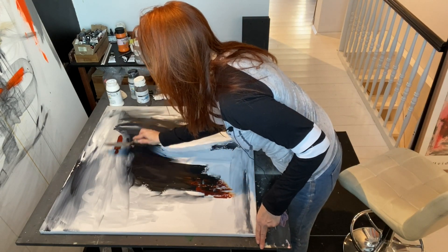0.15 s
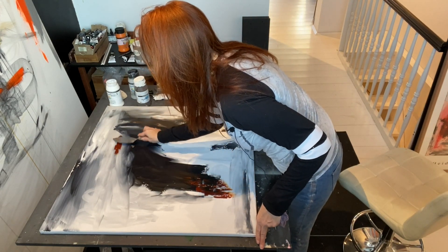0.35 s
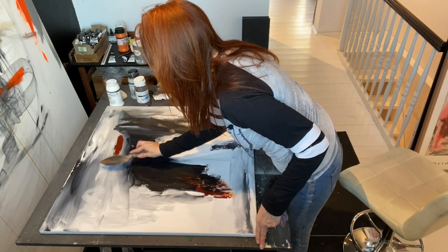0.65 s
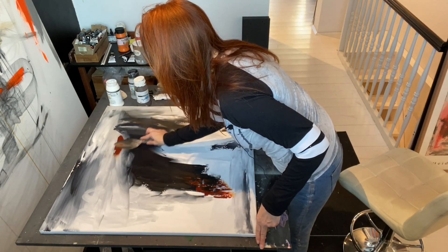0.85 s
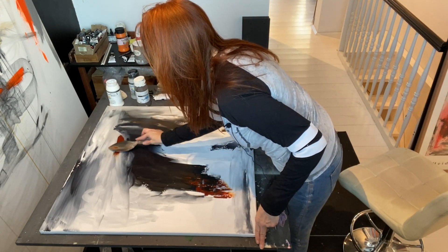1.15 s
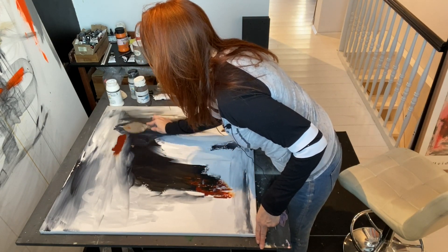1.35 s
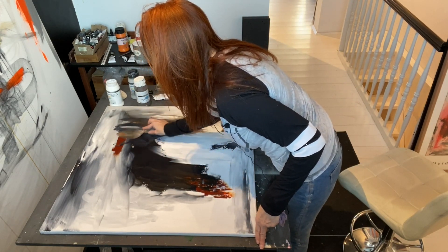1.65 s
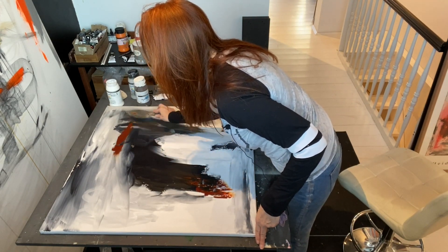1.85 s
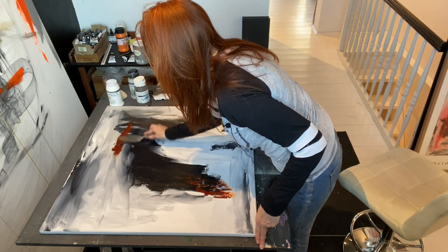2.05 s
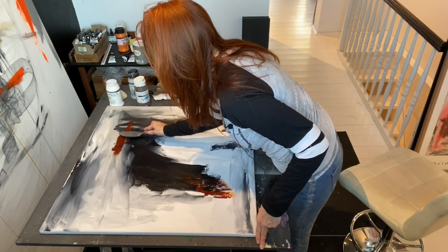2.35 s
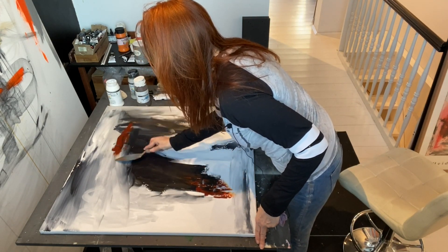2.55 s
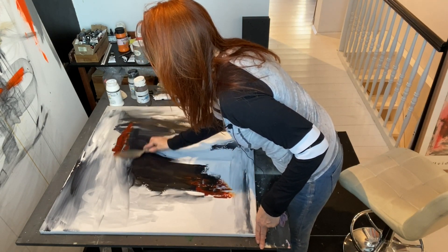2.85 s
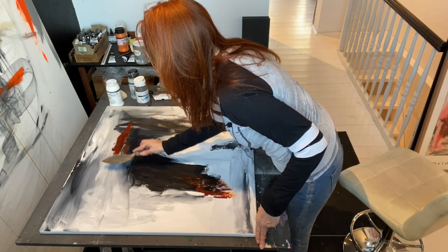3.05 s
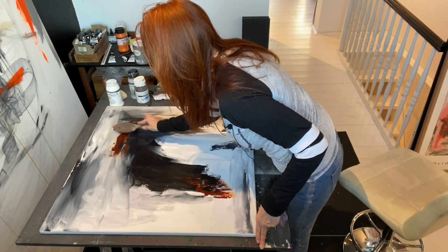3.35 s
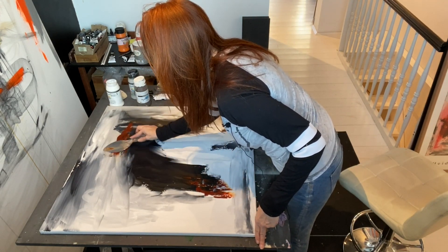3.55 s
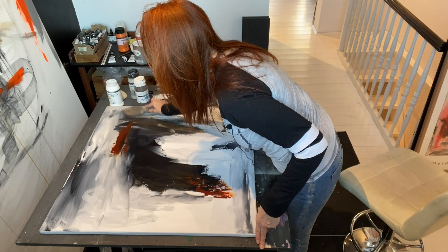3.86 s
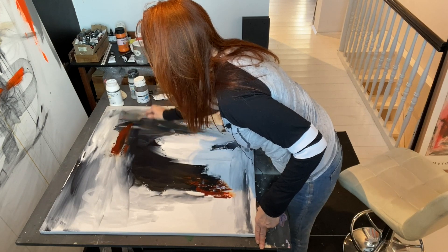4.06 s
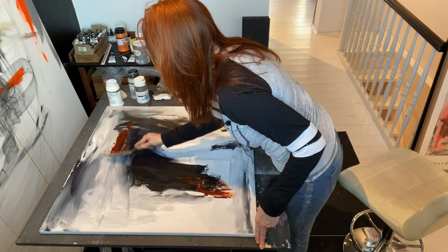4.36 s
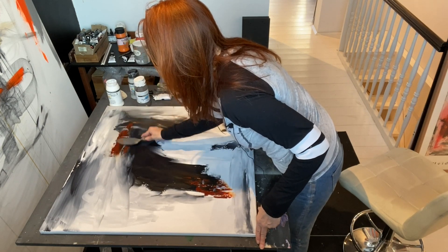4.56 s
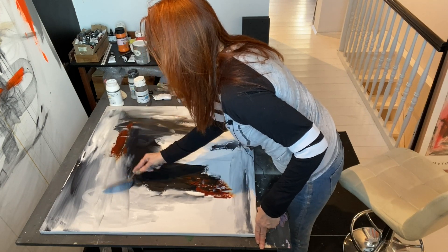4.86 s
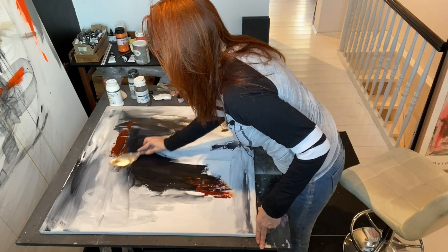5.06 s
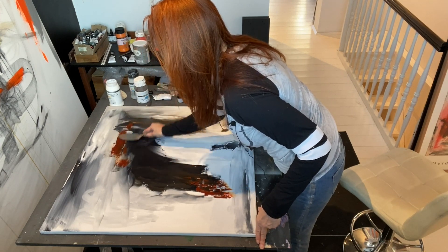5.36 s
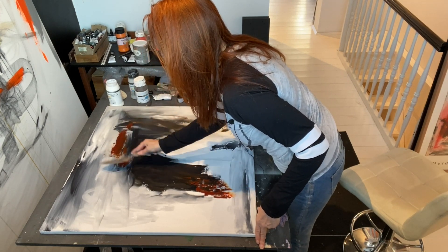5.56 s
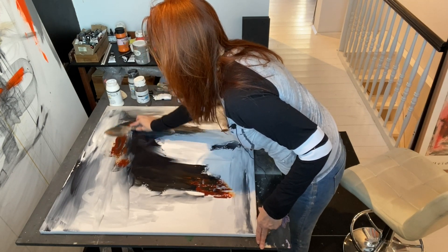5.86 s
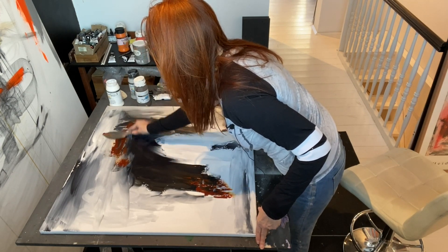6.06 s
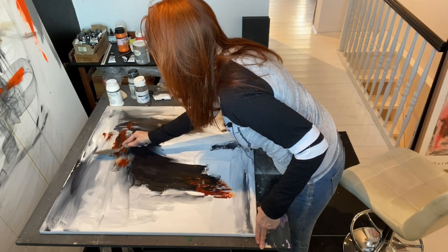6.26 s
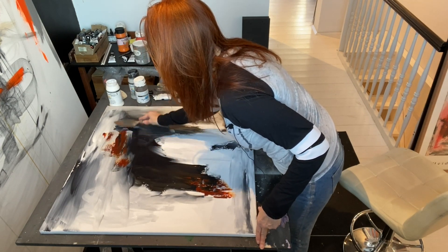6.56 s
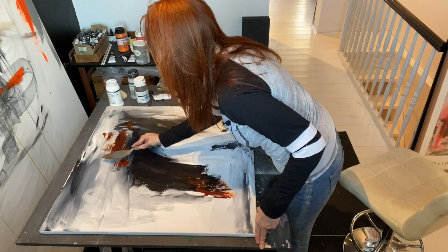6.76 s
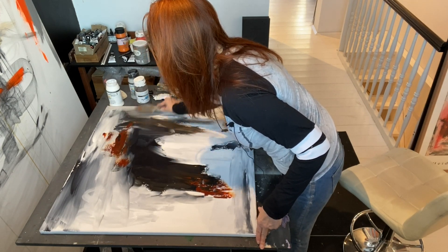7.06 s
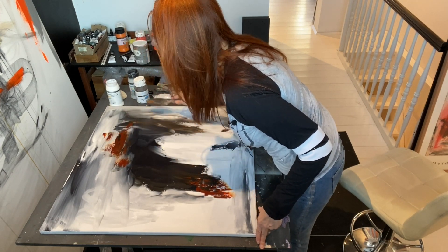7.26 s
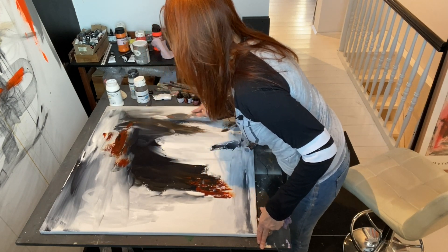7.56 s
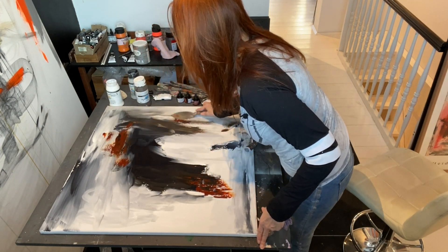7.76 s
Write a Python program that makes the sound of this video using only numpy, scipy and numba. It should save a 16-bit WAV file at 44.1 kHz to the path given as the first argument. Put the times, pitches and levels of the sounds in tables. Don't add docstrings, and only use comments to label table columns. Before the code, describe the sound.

Close phone pickup in an open, hard-floored studio: quiet room tone and slow low pushes of air. A flexible metal blade lands on taut canvas with dull hollow knocks, then drags briefly over the weave, chattering, rasping and hissing through paint. Early strokes are lighter; from two seconds they grow firmer, strongest around five to seven. Small chirping squeaks and soft hand bumps on the table accompany them. After a thin steel ring and a short gap, one last light stroke.

```python
import sys
import numpy as np
from scipy import signal
from scipy.fft import rfft, irfft
from scipy.io import wavfile
from scipy.ndimage import uniform_filter1d
from numba import njit

SR = 44100
rng = np.random.default_rng(int(sys.argv[2]) if len(sys.argv) > 2 else 0)


def to_linear_factor(level_db):
    exponent = np.asarray(level_db, float) / 20
    return 10 ** exponent


def wrap_up_sound(samples):
    columns = np.atleast_2d(samples).T
    tamed = np.clip(columns, -1, 1)
    steps = np.round(tamed * 32767).astype(np.int16)
    wavfile.write(sys.argv[1], SR, steps)


N = 348588

# freq_hz, density_db
ROOM_TONE = [(35, -14), (60, 6), (103, -32), (227, -10.5), (492, -55), (760, -33.5), (3000, -38),
             (16000, -44.5)]
# freq_hz, density_db
DRAUGHT_SPECTRUM = [(1.2, 5.5), (2.0, 18.5), (17, -3), (24, -10), (90, -40.5), (120, -118), (200, -120)]
# time_s, level_db
GUST_LEVELS = [(0.0, -28), (0.51, -32.5), (3.5, -34), (3.56, -26.5), (3.8, -39), (3.849, -30), (4.0, -49),
               (4.161, -26.5), (4.25, -34), (6.16, -37), (6.199, -28), (6.4, -39), (6.65, -34.5),
               (7.08, -37.5), (7.37, -26.5), (7.48, -40), (7.68, -44), (7.9, -30.5)]
# freq_hz, width_hz, level_db
DRONE = [(25.4, 7, -65.5), (39.3, 3.4, -56)]
# start_s, peak_db, pitch_hz
SOFT_BUMPS = [(0.03, -35.5, 53), (0.219, -57, 247), (0.34, -50.5, 95), (0.358, -58, 199), (0.622, -54, 146),
              (1.167, -50.5, 157), (1.624, -49.5, 135), (1.873, -56, 140), (2.069, -51, 133),
              (2.389, -50.5, 138), (2.618, -50.5, 142), (3.198, -49, 95), (3.59, -49, 141),
              (4.151, -54, 119), (4.328, -56, 144), (4.551, -62.5, 310), (4.748, -55, 148),
              (4.887, -66, 157), (5.061, -50.5, 175), (5.6, -71, 135), (6.075, -47.5, 266),
              (6.075, -38.5, 565), (6.198, -58, 113), (6.701, -60.5, 207), (6.918, -44, 108),
              (7.036, -63, 418), (7.328, -55, 145), (7.639, -52, 133)]
# centre_hz, t60_s, level_db
ROOM_OCTAVES = [(402, 0.33, 8.5), (867, 0.5, 2), (1570, 0.8, 2), (2950, 0.4, 0), (6100, 0.4, -0.5),
                (11300, 0.17, 4.5)]
# freq_hz, width_hz, level_db, t60_s
BLADE_MODES = [(2350, 320, 0, .75), (2770, 260, -4, .55), (3650, 400, -9, .5), (5400, 300, -10, .55),
               (6450, 500, -12, .4), (8310, 350, -11, .45), (9850, 600, -12, .3)]
# start_s, length_s, from_hz, to_hz, level_db
BLADE_SQUEAKS = [(.457, 0.025, 1560, 1500, -46), (2.435, 0.015, 5900, 5900, -66),
                 (2.889, 0.049, 1755, 1750, -50.5), (2.886, .04, 2090, 2150, -50.5),
                 (4.158, 0.021, 1720, 1630, -47), (4.632, 0.065, 1800, 1900, -49),
                 (4.695, 0.065, 1720, 1600, -48), (.015, .05, 1220, 1150, -50),
                 (6.38, .02, 2200, 2200, -54), (1.72, 0.043, 1294, 1190, -49),
                 (5.123, 0.07, 1870, 1880, -53), (5.452, 0.034, 2350, 2400, -49),
                 (5.456, 0.026, 4750, 4830, -60), (6.198, 0.033, 1750, 1720, -52),
                 (6.435, 0.1, 1860, 1830, -48), (6.7, 0.05, 2350, 2350, -53),
                 (7.026, 0.058, 2390, 2400, -50.5), (7.03, 0.032, 2850, 2770, -59),
                 (7.851, 0.046, 2550, 2660, -52)]
# start_s, length_s, from_hz, to_hz, level_db
SINGING_RUNS = [(.78, 0.096, 1270, 1170, -53.5), (1.765, 0.037, 820, 805, -46.5),
                (2.535, 0.029, 1720, 1460, -51), (3.19, 0.022, 1010, 1050, -40),
                (3.225, 0.062, 1170, 1200, -44.5), (3.3, 0.059, 1250, 1290, -47),
                (3.62, 0.081, 1080, 1310, -51), (3.805, 0.021, 870, 845, -40.5),
                (4.15, 0.08, 780, 805, -48), (4.66, 0.11, 1140, 1160, -43.5),
                (5.455, 0.057, 1150, 1130, -47), (5.755, 0.024, 1050, 1090, -36),
                (5.787, 0.038, 1220, 1250, -37.5), (5.83, 0.04, 1270, 1360, -42.5),
                (5.88, .035, 1320, 1370, -42.5), (6.14, 0.073, 1120, 1330, -44),
                (6.43, 0.044, 1320, 1420, -44.5), (6.635, 0.022, 790, 820, -41),
                (1.2, 0.044, 700, 885, -56.5), (4.24, 0.045, 1160, 1190, -49.5),
                (6.66, 0.024, 1110, 1150, -41), (6.69, .02, 1150, 1100, -44.5),
                (6.715, 0.017, 900, 890, -47), (7.8, 0.055, 840, 940, -55.5)]
# start_s, length_s, from_hz, to_hz, level_db
FREE_END_PATCHES = [(.012, 0.034, 5360, 5270, -50.5), (.012, 0.044, 4000, 4650, -52.5),
                    (.015, 0.06, 2980, 3040, -53.5), (.32, 0.047, 800, 700, -65.5),
                    (.47, .03, 2900, 2900, -56), (.51, 0.05, 2950, 2850, -52),
                    (6.15, 0.061, 1610, 1750, -50.5), (6.435, 0.055, 1690, 1600, -51.5),
                    (2.53, 0.056, 4200, 4100, -52.5), (.778, .05, 1110, 1010, -50),
                    (.905, 0.035, 2500, 2520, -52.5), (2.15, 0.025, 3200, 2900, -54),
                    (3.815, 0.027, 2790, 2770, -51), (.47, .08, 5400, 4970, -52),
                    (1.215, 0.11, 2830, 2950, -58), (1.22, 0.087, 5430, 5050, -68),
                    (1.25, 0.077, 1870, 1870, -62), (1.71, .03, 5600, 5700, -70),
                    (1.8, 0.018, 6200, 6160, -66), (2.875, 0.049, 4300, 4340, -60),
                    (2.91, .06, 3200, 3100, -54.5), (3.19, .06, 5400, 5400, -65),
                    (4.21, .1, 3100, 3200, -57.5), (4.25, 0.076, 3730, 4600, -52.5),
                    (4.74, .045, 4180, 4200, -49), (4.78, 0.064, 2900, 2850, -49),
                    (4.805, 0.055, 3460, 3400, -49.5), (5.45, 0.031, 3300, 3300, -55),
                    (5.51, 0.05, 2680, 2580, -54), (6.13, 0.1, 4850, 5360, -57),
                    (6.15, .09, 3200, 3100, -55.5), (6.19, .06, 2420, 2500, -56),
                    (6.43, 0.063, 3200, 3420, -58), (6.64, 0.036, 5460, 5450, -54.5),
                    (7.85, 0.047, 3100, 3100, -55), (7.85, 0.046, 4230, 4200, -62)]
# start_s, peak_db, cloth_pitch_hz, crack_db (re peak)
LANDINGS = [(0.459, -44, 1500, -4), (0.776, -33, 1180, -4), (1.189, -38.5, 726, -42), (1.452, -59, 910, 7),
            (1.585, -35, 716, -38), (2.047, -26.5, 790, -7), (2.39, -33, 780, -5), (2.443, -54, 721.3, 3),
            (2.767, -33.5, 785, -11), (3.183, -30.5, 1055, -15), (3.577, -26.5, 990, -14),
            (3.812, -46, 896, 2), (4.139, -31.5, 765, 0.5), (4.29, -45, 740, 26), (4.539, -30.5, 676, -16),
            (4.691, -44.5, 1120, 18), (5.039, -25.5, 920, 1.5), (5.358, -25.5, 810, -4.5),
            (5.5, -44.5, 1240, 26), (5.751, -26, 1070, -4.5), (6.072, -36.5, 586, 2.5),
            (6.372, -25.5, 1110, -15), (6.632, -30.5, 796, -12), (6.907, -27.5, 746, -11),
            (7.017, -37, 754, 7), (7.622, -30.5, 820, -6)]
# freq_hz, width_hz, level_db
CLOTH_MODES = [(518, 60, -10), (740, 55, 5), (1060, 45, 0.5), (1240, 40, -3), (1580, 70, -8),
               (2540, 120, -8), (3160, 900, -26)]
# freq_hz, width_hz, level_db
MOVING_CLOTH_MODES = [(555, 110, -9), (740, 31, 1.5), (870, 175, 3.5), (1170, 310, -0.5), (1750, 280, -5.5)]
# freq_hz, width_hz, level_db
RASP_MODES = [(2480, 630, 2), (2900, 420, 3), (3300, 880, 0.5), (4100, 740, -3), (4970, 520, -1.5),
              (5540, 400, -9), (6460, 1050, -14)]
# freq_hz, width_hz, level_db
HISS_MODES = [(8650, 5700, -11.5), (11080, 4100, -9.5), (12900, 4100, -10.5), (17220, 4700, 5)]
# start_s, length_s, touch_db, lift_db, thread_rate_hz
WEAVE_DRAGS = [(0.0, 0.084, -43, -51, 1070), (0.462, 0.11, -47, -44, 1010), (0.773, .16, -43, -52.5, 1100),
               (1.221, 0.14, -52.5, -59.5, 1000), (1.701, 0.13, -49.5, -50, 840),
               (2.137, 0.064, -56, -49, 980), (2.513, 0.071, -44, -51.5, 1210),
               (2.87, 0.09, -41.5, -44, 1207), (3.177, 0.19, -47, -48.5, 1030),
               (3.586, 0.1, -42, -56, 1060), (3.716, 0.05, -38.5, -44, 960),
               (3.804, 0.096, -41.5, -56, 835), (4.14, 0.064, -38, -53, 790),
               (4.208, .12, -46, -47.5, 1060), (4.628, 0.18, -48.5, -45, 1240),
               (5.054, 0.15, -44, -59.5, 1060), (5.441, 0.1, -42, -49.5, 1170),
               (5.747, 0.19, -43.5, -49, 1210), (6.079, 0.15, -53, -45, 1100),
               (6.391, 0.099, -56, -41, 1290), (6.626, 0.11, -44.5, -49, 1040),
               (6.92, 0.077, -55, -58, 880), (7.004, 0.048, -44, -51.5, 775),
               (7.715, 0.16, -59.5, -50.5, 900)]
# start_s, length_s, rasp_touch_db, rasp_lift_db, hiss_db (re rasp)
PAINT_SLIDES = [(0.0, 0.078, -45, -43.5, -1.5), (0.465, 0.06, -41, -42, -2.5),
                (0.777, 0.088, -50.5, -55.5, 1), (1.212, 0.17, -60.5, -68, -4), (1.699, 0.13, -73, -62, 5),
                (2.147, 0.05, -47.5, -50, -7.5), (2.869, 0.061, -72, -52.5, 11.5),
                (3.183, 0.084, -51.5, -50, -1), (3.574, 0.14, -48, -65, -2),
                (3.727, 0.075, -46.5, -55, -2.5), (4.14, 0.18, -67.5, -52.5, 4.5),
                (4.63, 0.041, -79, -74, 17), (4.693, 0.15, -48.5, -49.5, 5.5),
                (5.038, .13, -43.5, -47, -7.5), (5.45, 0.064, -55.5, -55, 2), (5.75, 0.13, -48.5, -71, 2.5),
                (6.064, 0.046, -41, -67, -5), (6.368, 0.034, -70, -76, 14),
                (6.629, 0.094, -49, -50.5, -1.5), (6.964, 0.03, -87, -68, -16), (7.66, 0.15, -85, -66, 6.5)]
# peak_s, rise_s, fall_s, rasp_db, hiss_db (re rasp)
WRIST_FLICKS = [(0.531, 0.016, 0.045, -41, 2.5), (.92, 0.037, 0.058, -54.5, -12),
                (2.555, 0.029, 0.03, -44.5, -1.5), (2.93, 0.016, 0.047, -43, -3),
                (3.33, 0.038, 0.044, -45.5, -4.5), (3.824, 0.0085, 0.038, -43.5, -5.5),
                (4.299, 0.0094, 0.022, -39, -7), (4.8, 0.073, 0.047, -37.5, -7.5),
                (5.513, 0.019, 0.023, -34.5, -6), (5.89, 0.042, 0.062, -42.5, -6.5),
                (6.2, 0.064, 0.043, -47.5, -1.5), (6.459, 0.024, 0.046, -50.5, 2),
                (7.026, 0.008, 0.04, -39, -2.5), (7.87, 0.012, 0.04, -50, -11)]

ROOM_TONE_DB = -66
ROOM_DB, SQUEAK_ECHO_DB = -8.5, -8
ECHO_CHANGE_S = 0.2
FREE_S, FREE_DB = 7.03, -55.5
THUD_DB = -24.5
SNAP_DB, SNAP_PER_DB = 1, 0.5
TOUCH_S, SLIDE_TOUCH_S = 0.02, 0.005
LIFT_S, SWELL_DB = 0.015, -2
SPEED_UP = 0.25
WEAVE_DB, SING_PER_DB = -14, 1.5
WANDER = 0.027
OPEN_S = 0.012


def unit(x):
    return x / np.sqrt(np.mean(x ** 2))


@njit
def svf(x, hz, width):
    y, band, low, g, k = np.empty(len(x)), 0., 0., 0., 0.
    for i in range(len(x)):
        if i == 0 or hz[i] != hz[i - 1]:
            g, k = np.tan(np.pi * hz[i] / SR), width / hz[i]
        v = (band + g * (x[i] - low)) / (1 + g * (g + k))
        band, low, y[i] = 2 * v - band, low + 2 * g * v, k * v
    return y


def ring(x, modes):
    return sum(to_linear_factor(db) * svf(x, np.full(len(x), 1. * hz), 1. * width) for hz, width, db in modes)


def walk(rate):
    hold = int(SR / rate)
    levels = np.repeat(rng.standard_normal(N // hold + 1), hold)
    return 2.85 * uniform_filter1d(levels, hold, mode="wrap")[:N]


def coloured(points):
    hz, db = np.transpose(points)
    f = np.arange(N // 2 + 1) * SR / N + 1e-3
    gain = to_linear_factor(np.interp(np.log(f), np.log(hz), db))
    return unit(irfft(rfft(rng.standard_normal(N)) * gain, N))


def patchy(x, modes, patchy_db, rate):
    out = np.zeros(N)
    for hz, width, db in modes:
        straying_hz = hz * (1 + WANDER * np.tanh(walk(rate=12)))
        out += svf(x, straying_hz, 1. * width) * to_linear_factor(db + patchy_db * walk(rate))
    return unit(out)


def air():
    tone = to_linear_factor(ROOM_TONE_DB + 0.8 * walk(rate=6)) * coloured(ROOM_TONE)
    drone = np.zeros(N)
    for hz, width, db in DRONE:
        drone += to_linear_factor(db) * unit(ring(rng.standard_normal(N), [(hz, width, 0)]))
    gust_db = np.interp(np.arange(N) / SR, *np.transpose(GUST_LEVELS))
    return tone + drone + to_linear_factor(gust_db) * coloured(DRAUGHT_SPECTRUM)


def bumps():
    out, t = np.zeros(N + SR), np.arange(SR // 5) / SR
    swell = t / 0.018 * np.exp(1 - t / 0.012)
    for s, db, hz in SOFT_BUMPS:
        out[int(s * SR):][:len(t)] += to_linear_factor(db) * np.sin(2 * np.pi * hz * t) * swell
    return out[:N]


def room(x):
    t, hop = np.arange(SR // 2) / SR, int(ECHO_CHANGE_S * SR)
    x, out = np.pad(x, 2 * hop), np.zeros(N + 2 * SR)
    fade = np.hanning(2 * hop)
    for start in range(hop, N + 2 * hop, hop):
        noise = rng.standard_normal(len(t))
        tail = sum(ring(noise, [(hz, 0.72 * hz, db)]) * to_linear_factor(-60 * t / t60) for hz, t60, db in ROOM_OCTAVES)
        tail = tail * np.clip((t - 0.002) / 0.0016, 0, 1)
        piece = x[start:start + 2 * hop]
        echo = signal.fftconvolve(piece * fade[:len(piece)], tail / np.sqrt(np.sum(tail ** 2)))
        out[start:start + len(echo)] += echo
    return out[2 * hop:][:N]


def freed_blade():
    t = np.clip(np.arange(N) / SR - FREE_S, 0, None)
    noise, out = rng.standard_normal(N), np.zeros(N)
    for hz, width, db, t60 in BLADE_MODES:
        mode = [(hz, width, 0)]
        out += unit(ring(ring(noise, mode), mode)) * to_linear_factor(db - 60 * t / t60)
    return to_linear_factor(FREE_DB) * np.clip(t / 0.011, 0, 1) * out


def squeaks(table, width_hz):
    out = np.zeros(N + SR)
    for s, length, from_hz, to_hz, db in table:
        along = np.linspace(0, 1, int(length * SR))
        hz = from_hz + (to_hz - from_hz) * along
        noise = rng.standard_normal(SR // 4)[:len(along)]
        tone = svf(svf(noise, hz, width_hz), hz, width_hz)
        out[int(s * SR):][:len(along)] += to_linear_factor(db) * unit(tone) * np.sin(np.pi * along) ** 0.5
    return out[:N]


def knocks():
    out, t = np.zeros(N + SR), np.arange(SR // 8) / SR
    push = t / 0.000082 * np.exp(1 - t / 0.000094)
    thud = np.sin(2 * np.pi * 130 * t) * np.exp(-t / 0.013)
    thud = thud + 1.7 * np.sin(2 * np.pi * 400 * t) * np.exp(-t / 0.0046)
    for s, db, hz, crack_db in LANDINGS:
        noise = rng.standard_normal(len(t))
        body = ring(push, CLOTH_MODES) + ring(push, [(hz, 220, -3.)])
        body = body + ring(0.048 * noise * np.exp(-t / 0.048), MOVING_CLOTH_MODES)
        burst = noise * (np.exp(-t / 0.00074) + 0.24 * np.exp(-t / 0.0074))
        snap = to_linear_factor(SNAP_DB + SNAP_PER_DB * crack_db) * ring(burst, HISS_MODES)
        crack = ring(burst, RASP_MODES) + snap
        knock = body / np.abs(body).max() + to_linear_factor(crack_db) * crack / np.abs(crack).max() + to_linear_factor(THUD_DB) * thud
        out[int((s + 0.0007) * SR):][:len(t)] += to_linear_factor(db) * knock
    return out[:N]


def contact(s, length, touch_db, lift_db, touch_s):
    gain, along = np.zeros((2, N))
    near = slice(int(s * SR), int((s + length + LIFT_S) * SR))
    t = np.arange(N)[near] / SR - s
    u = np.clip(t / length, 0, 1)
    touch = np.clip(t / touch_s, 0, 1)
    lift = np.clip(1 + (length - t) / LIFT_S, 0, 1) ** 2
    along[near] = u
    gain[near] = to_linear_factor(touch_db + (lift_db - touch_db) * u + SWELL_DB * np.sin(np.pi * u)) * touch * lift
    return gain, along


def flick(s, rise, fall, db):
    t = np.arange(N) / SR - s
    return to_linear_factor(db) * np.exp(-(t / np.where(t < 0, rise, fall)) ** 2)


def strokes():
    drag, hz = np.zeros(N), np.full(N, 1000.)
    for s, length, touch_db, lift_db, thread_hz in WEAVE_DRAGS:
        gain, along = contact(s, length, touch_db, lift_db, TOUCH_S)
        drag = drag + gain
        hz = np.where(along > 0, thread_hz * (1 + SPEED_UP * (along - 0.5)), hz)
    edge = [(contact(*row[:4], SLIDE_TOUCH_S)[0], row[4]) for row in PAINT_SLIDES]
    edge += [(flick(*row[:4]), row[4]) for row in WRIST_FLICKS]
    scrape = np.sqrt(sum(gain ** 2 for gain, _ in edge))
    shear = np.sqrt(sum((gain * to_linear_factor(hiss_db)) ** 2 for gain, hiss_db in edge))

    slip = to_linear_factor(1.23 * walk(rate=70))
    grit = rng.standard_normal(N) * to_linear_factor(3.0 * np.minimum(rng.exponential(size=N), 5))
    threads = svf(svf(grit, hz, 290.0), hz, 290.0) * to_linear_factor(2.0 * walk(rate=80))
    overtone = svf(unit(threads) ** 2, 2 * hz, 270.0)
    sing = to_linear_factor(WEAVE_DB) * (drag / to_linear_factor(-45)) ** SING_PER_DB
    chatter = sing * (unit(threads) + to_linear_factor(-12) * unit(overtone))
    chatter = chatter + patchy(grit, MOVING_CLOTH_MODES, 2.2, rate=35)
    rasp = patchy(grit, RASP_MODES, 2.2, rate=35)
    hiss = patchy(grit, HISS_MODES, 1.07, rate=170)
    chatter = signal.sosfilt(signal.butter(3, 480, "high", fs=SR, output="sos"), chatter)
    return drag * slip * chatter + to_linear_factor(-5.0) * scrape * rasp + to_linear_factor(1.5) * shear * hiss


def scene():
    knife = strokes() + knocks() + squeaks(FREE_END_PATCHES, 720.0)
    tones = squeaks(BLADE_SQUEAKS, 110.0) + squeaks(SINGING_RUNS, 200.0)
    echo = to_linear_factor(ROOM_DB) * room(knife + to_linear_factor(SQUEAK_ECHO_DB) * tones)
    opening = np.clip(np.arange(N) / SR / OPEN_S, 0, 1) ** 2
    mix = (knife + tones + echo) * opening + freed_blade() + bumps() + air()
    return mix[None]


def low_pass(x):
    return signal.sosfilt(signal.butter(12, 16500, fs=SR, output="sos"), x)


def record(dry):
    top_cut = signal.ellip(8, 0.3, 45, 15750, fs=SR, output="sos")
    mix = signal.sosfilt(top_cut, dry)
    return low_pass(mix)


dry = scene()
out = record(dry)
wrap_up_sound(out)
```